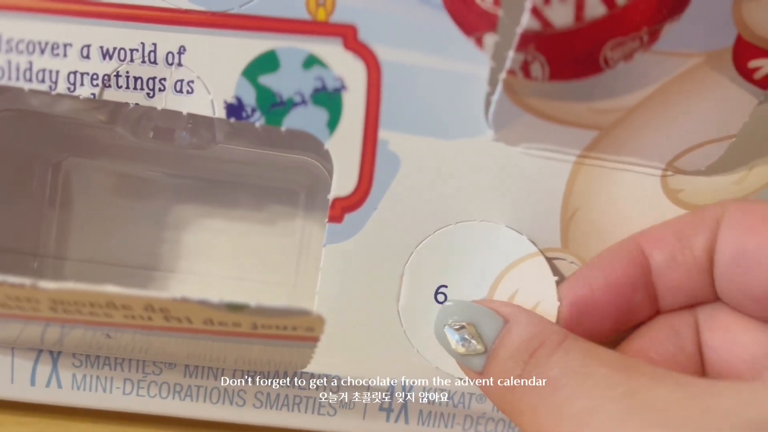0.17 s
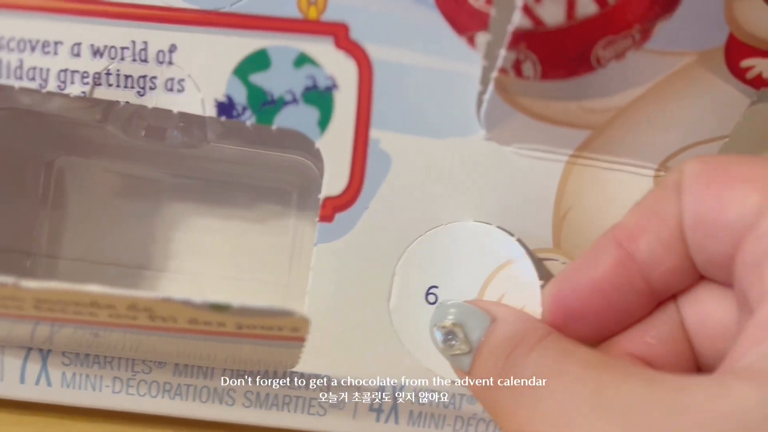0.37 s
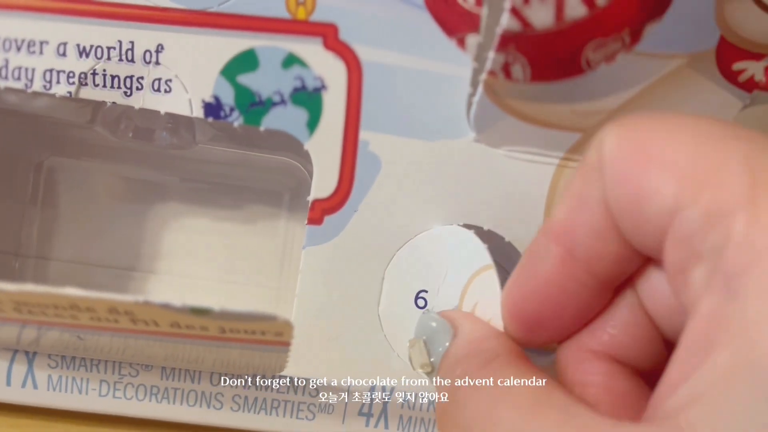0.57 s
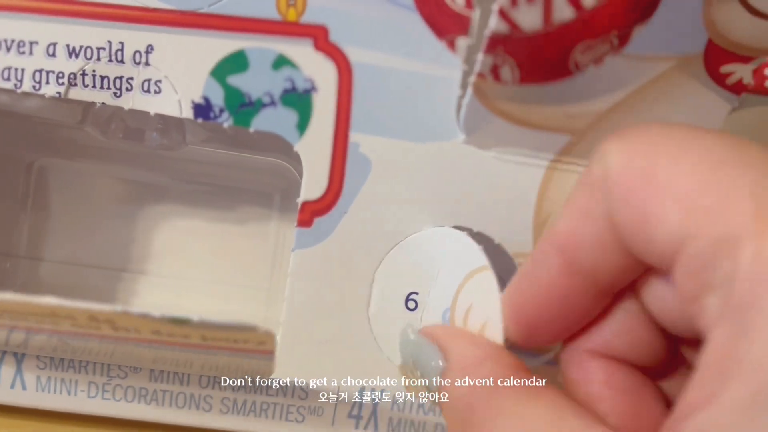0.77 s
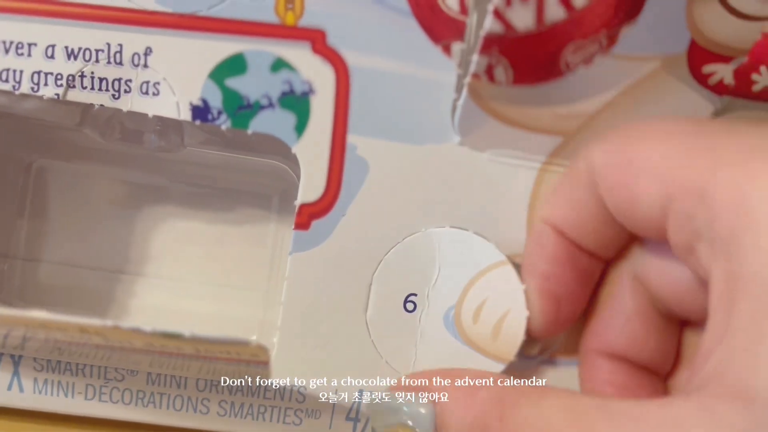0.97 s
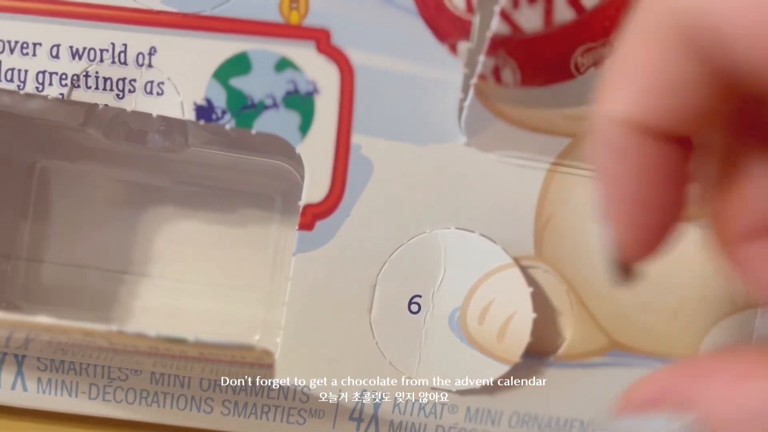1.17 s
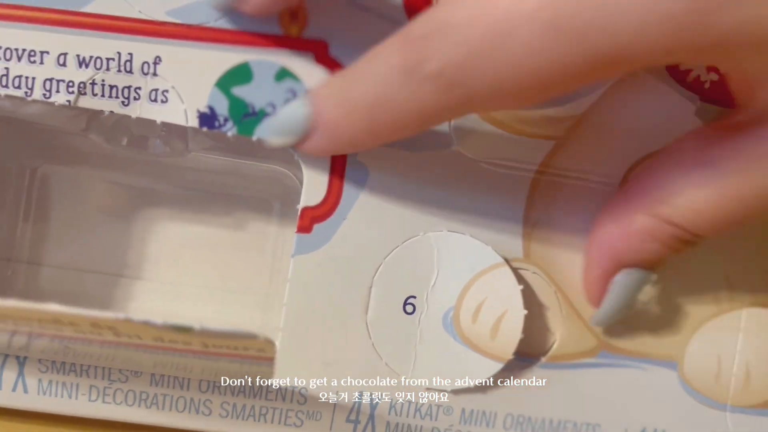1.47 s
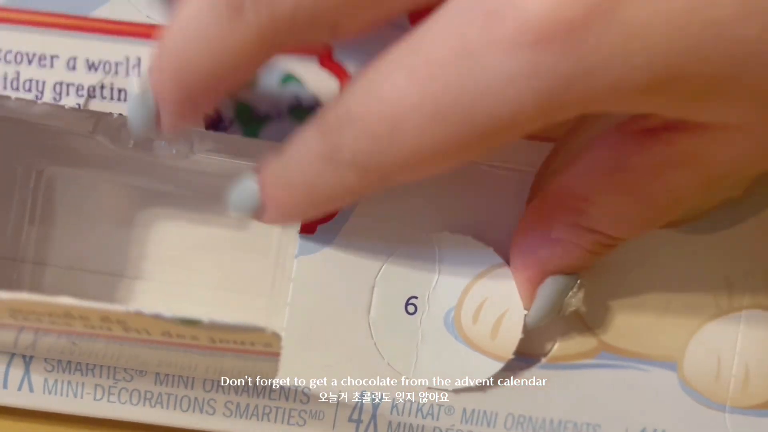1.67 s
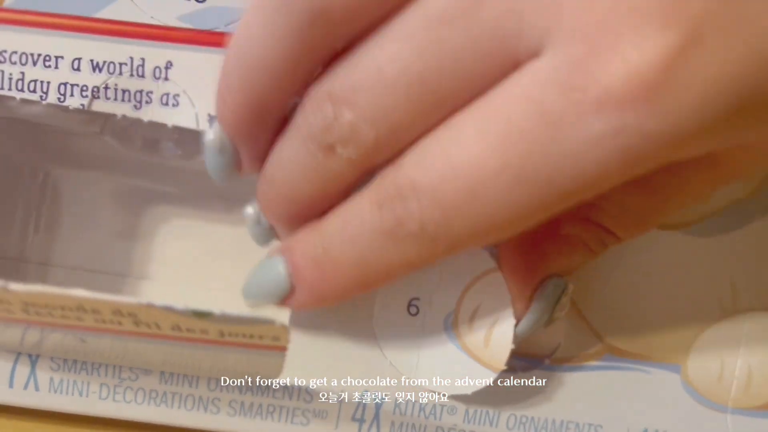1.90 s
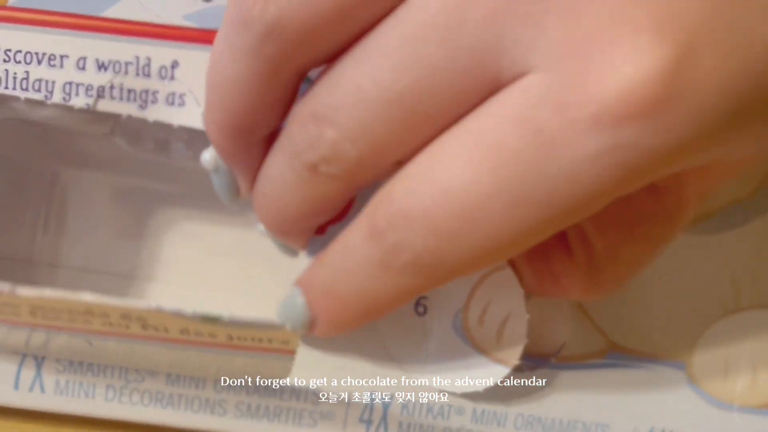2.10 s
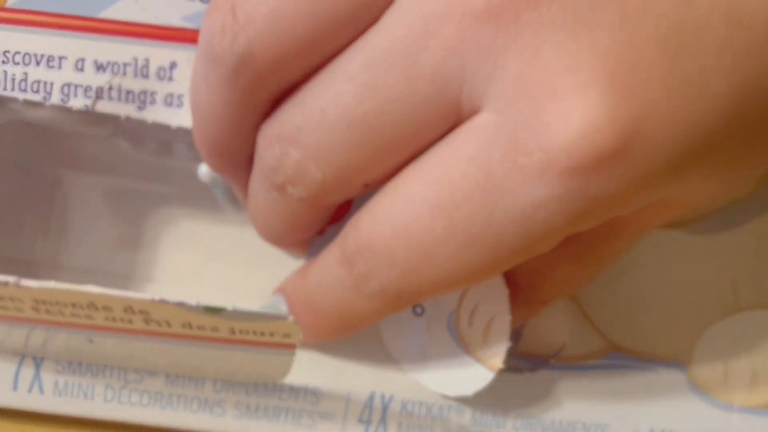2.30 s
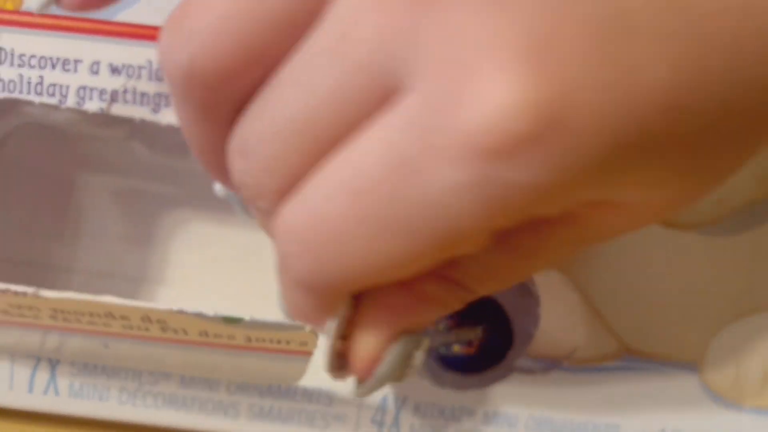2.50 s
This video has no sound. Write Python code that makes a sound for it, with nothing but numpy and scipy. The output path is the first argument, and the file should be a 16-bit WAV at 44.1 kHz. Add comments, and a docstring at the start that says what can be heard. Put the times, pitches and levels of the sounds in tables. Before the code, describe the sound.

Fingernails pry open a small perforated cardboard door with crisp snaps, scrapes and final foil crackles

```python
"""Ticks, sharp snaps and sliding fingers are heard from the start and throughout, close up in a small room.
Fingernails pry at the perforated door of a cardboard calendar; later presses end in a run of foil cracks.
Each snap is a set of dying sine waves for the stiff card, plus dying noise for the hollow box.
Sliding is grainy filtered noise, a brief groan is a wavering tone, and bumps are low sines.
Room echo, a low rumble and a quiet noise floor lie underneath."""
import sys
import numpy as np
from scipy import signal
from scipy.fft import rfft, irfft, next_fast_len
from scipy.io import wavfile
from scipy.ndimage import uniform_filter1d

SR = 44100
rng = np.random.default_rng(int(sys.argv[2]) if len(sys.argv) > 2 else 0)


def to_wav(s):
    """Save 16-bit WAV."""
    ch = np.atleast_2d(s).T  # columns
    pcm = np.round(np.clip(ch, -1, 1) * 32767)  # PCM
    wavfile.write(sys.argv[1], SR, pcm.astype(np.int16))


N = 116865
TIME = np.arange(N) / SR  # seconds

# Snaps of card, nail and foil: start_s, part that gives way, then level_db in each of six bands
SNAPS = [(.06, "card", -56.5, -44.5, -42, -35.5, -54, -62), (0.09, "card", -68, -55, -45, -37, -49.5, -68),
         (.113, "card", -60, -46, -41, -38, -48, -61), (0.1309, "card", -40.5, -47, -43, -49, -40.5, -46),
         (0.1844, "first tab", -36, -34, -30, -19.5, -22.5, -27),
         (0.3671, "last tab", -31, -29.5, -20.5, -18.5, -21.5, -28.5),
         (0.9757, "flap", -34.5, -30.5, -38, -31, -22, -34.5),
         (1.346, "card", -48.5, -23.5, -31, -29, -28, -43),
         (1.3532, "foil", -31.5, -39, -30, -33, -31, -39.5),
         (1.378, "last tab", -45.5, -47, -41, -43.5, -43, -52),
         (1.5436, "card", -48, -37.5, -40, -40, -43, -48),
         (1.5939, "card", -35, -41, -43.5, -34, -42, -48.5),
         (1.9333, "foil", -45, -35, -38.5, -49, -41, -52),
         (2.2586, "tray", -39, -34, -25.5, -23.5, -25, -32),
         (2.3315, "foil", -31.5, -25.5, -31.5, -24, -23.5, -31.5),
         (2.336, "foil", -46, -27.5, -33.5, -24.5, -37, -27),
         (2.3592, "foil edge", -51, -40.5, -34.5, -33.5, -31.5, -29),
         (2.386, "foil edge", -46.5, -34, -31.5, -32, -25, -41)]
# Borders of those six bands: edge_hz
BAND_EDGES_HZ = [40, 180, 700, 1500, 3000, 7500, 16000]
SNAP_GAIN_DB, SNAP_ATTACK_S = -0.5, 0.017  # the band levels are set over the attack
# Ringing notes of the card, before random detuning: pitch_hz, level_db, fade_by_60_db_s
CARD = [(803, -10.5, 0.031), (1010, -6.5, .017), (1752, -10, 0.045), (2166, 1, 0.019), (2448, -2, 0.021),
        (3080, -4, 0.012), (4210, -5.5, 0.0072), (5500, -3, 0.0035), (11130, -7, .0033)]
# The same columns for each part that gives way, listed by name
PART_MODES = {"card": CARD, "first tab": [(2222, 1, 0.011), (2960, -6.5, 0.0078), (5500, -1.5, 0.0037),
              (11600, -1.5, .0033)], "last tab": [(1059, -4.5, 0.031), (1870, -7.5, 0.021),
              (2174, 4.5, 0.0097), (2776, -7, .01), (4490, -4.5, 0.0048), (10900, 5, 0.0029)],
              "flap": [(714, -14, 0.047), (2670, 2, 0.006), (4220, -1.5, 0.0068), (5530, -12.5, 0.0091),
              (7000, -4, 0.0082), (10200, -10, 0.0028)], "tray": [(915, -14, 0.029), (1670, -12.5, 0.072),
              (2250, 11.5, 0.0054), (3050, 1, 0.0066), (4150, -6, 0.0051), (10600, -2, 0.0052)],
              "foil": [(860, -6, 0.035), (1580, -27, 0.0071), (2250, -1, 0.015), (4140, -3.5, 0.0037),
              (10860, 2, 0.003)], "foil edge": [(940, -1.5, 0.011), (3320, -1.5, 0.0094),
              (4030, -6, 0.0059), (11400, -17, 0.002)]}
DETUNE = 0.0062  # typical random shift, as a fraction of the pitch
GIVE_WAY_S = 0.00049  # the card takes this long to give way
# Dense ringing of the box and tray: band_hz, level_db_per_hz, fade_by_60_db_s
BOX_RINGING = [(70, -2, 0.16), (155.7, -3.5, 0.18), (350, -5.5, 0.18), (880, 0.5, 0.1), (2170, 1, 0.029),
               (4400, -6, 0.0084), (7900, -0.5, 0.012), (13000, 1.5, 0.0044)]
# The bass takes longer to build up; the extra time is half as long at BOX_SWELL_HZ
BOX_DB, BOX_SWELL_S, BOX_SWELL_HZ = -12, 0.0038, 400

# Ticks of a nail's edge, a crack and a short ring without the box's noise:
# start_s, peak_db, crack_db against the card's ring
TICKS = [(.02, -32, -26), (.128, -25.5, -8), (.142, -30, 21), (.173, -28, 12), (.312, -34, 34),
         (.679, -51.5, -28), (.748, -43, -8), (.802, -52, -28), (.844, -42.5, -13), (0.871, -51, -7),
         (.948, -39, -12), (1.256, -52, -19), (1.3075, -34.5, -9), (1.482, -32.5, -7), (1.901, -32.5, -8),
         (2.003, -27, 3), (2.028, -33, -5), (2.072, -34, -9), (2.094, -33.5, -24), (2.3015, -20, 17),
         (2.583, -34, -14), (2.622, -41, -18)]
TICK_CRACK_FADE_S = 0.0079  # time to fall by 60 dB

# Fibres and foil crackle ever louder until they give: start_s, length_s, final_level_db
TEARS = [(.950, 0.029, -27.5), (1.914, 0.036, -34), (2.313, 0.035, -37), (2.348, .018, -17.5),
         (2.363, 0.03, -24)]
# Tone colour of the tearing: band_hz, level_db_per_hz
TEAR_COLOUR = [(900, -1), (2200, -6), (3600, 2.5), (5500, -9), (8000, -5), (11000, -8.5), (16000, -30.5)]
TEAR_RISE_DB = 26

# Sliding fingers, before the gains below: time_s, murmur_level_db, scrape_level_db, hiss_level_db
SLIDES = [(0, -40.5, -50, -89), (.1, -48, -67, -105), (.16, -43.5, -48.5, -62), (.32, -55.5, -46, -64),
          (.645, -65.5, -61, -98), (.675, -42, -54.5, -66), (.72, -49.5, -61.5, -63), (.76, -56, -45, -70),
          (.79, -61, -66, -80), (.86, -49, -54.5, -62), (.9, -54, -64.5, -82), (.968, -54, -47.5, -67.5),
          (1.12, -84, -79.5, -85), (1.28, -68.5, -86, -94), (1.315, -43, -60, -61),
          (1.43, -35.5, -50.5, -61), (1.5, -55, -50.5, -54), (1.62, -39.5, -50, -50.5),
          (1.695, -47, -54.5, -67), (1.76, -39.5, -45, -48.5), (1.805, -39.5, -54, -85),
          (1.87, -32.5, -49, -70), (1.935, -40, -40.5, -60), (1.985, -39.5, -56, -68),
          (2.07, -32.5, -51, -45.5), (2.12, -37, -51, -52), (2.16, -39.5, -44, -44),
          (2.235, -42.5, -47.5, -65), (2.31, -77, -44, -43.5), (2.45, -55, -78, -52),
          (2.52, -31.5, -40.5, -47.5), (2.555, -44, -52, -77), (2.598, -24, -56, -86),
          (2.638, -41, -58, -95)]
# Tone colour of the box's hollow murmur: band_hz, level_db_per_hz
MURMUR_COLOUR = [(110, -7), (190, 1.5), (290, 1.5), (420, 4), (600, -4), (850, -2.5), (1200, -31.5)]
# Tone colour of the scrape: band_hz, level_db_per_hz
SCRAPE_COLOUR = [(800, -6), (1400, 1), (2200, -7), (3200, -7.5), (4800, -17.5), (7000, -15.5), (8500, -51)]
# Tone colour of the fine hiss: band_hz, level_db_per_hz
HISS_COLOUR = [(7500, -5.5), (10800, -6), (13000, -5), (15000, -29.5)]
MURMUR_GAIN_DB, SCRAPE_GAIN_DB, HISS_GAIN_DB = -6.5, -3.5, 2
GRAINS_PER_S, GRAIN_SPREAD_DB = 1800, 3.6
GRAIN_SHARE = 0.55  # grains' share of the power; smooth noise has the rest
CATCH_SPREAD_DB, CATCH_S = 2.6, 0.007  # how unevenly the fingers drag, and the length of one catch
CRACKLES_PER_S, CRACKLE_DB = 90, -3.5

# A fingertip judders across the lid: time_s, slips_hz before wavering, level_db
JUDDER = [(1.83, 323, -50), (1.865, 266, -37.5), (1.925, 272, -29), (1.965, 370, -55)]
JUDDER_ROUGHNESS = 0.2  # typical wavering, as a fraction of the slip rate

# The hand bumps the box: start_s, peak_db
BUMPS = [(0.139, -39), (0.761, -43), (1.263, -36), (1.312, -26.5), (1.629, -30.5), (1.735, -28),
         (1.755, -26), (2.148, -31), (2.271, -28.5), (2.441, -35.5), (2.593, -31.5)]
# Lowest notes of the box: pitch_hz, level_db, fade_by_60_db_s
BUMP_MODES = [(65.5, -2, 0.25), (86, -0.5, 0.092), (130.2, -2.5, 0.14)]
BUMP_CONTACT_S = 0.0099
# Tone colour of the holding hand's rumble: band_hz, level_db_per_hz
RUMBLE_COLOUR = [(35, -20.5), (58, 20.5), (100, 4.5), (160, 3), (300, -33)]
# Loudness of that rumble: time_s, level_db
RUMBLE_LEVEL = [(0, -50), (1.15, -54.5), (1.45, -46), (2.65, -46)]

# Hollow notes of the box: pitch_hz, width_hz, level_db
HOLLOW_NOTES = [(264.7, 16, 0), (370, 66, -5.5), (762, 47, -4)]
# The room's tail: band_hz, level_db_per_hz, fade_by_60_db_s
ROOM_TAIL = [(99.5, -7.5, 0.38), (400, -4, 0.092), (870, 1, 0.3), (2200, -3.5, 0.38), (5130, -4, 0.35),
             (7450, -6.5, 0.26)]
ROOM_DB, ROOM_SWELL_S = -21, 0.013
# The calendar lies to the left: band_hz, left_minus_right_db
LEFTNESS = [(80, 0.5), (250, 4.5), (550, 8), (1100, 4.5), (2300, 3), (4500, 8), (9000, -0.5)]
RIGHT_LAG_S = 0.000016
# How alike left and right are in noise: band_hz, correlation (no unit)
LIKENESS = [(60, 0.8), (350, 0.86), (950, 0.065), (2300, 0.37), (6000, 0.27), (14000, 0.34)]

# Tone colour of the quiet background: band_hz, level_db_per_hz
FLOOR_COLOUR = [(30, -5.5), (60, 3.5), (250, -4.5), (1000, -36.5), (4000, -38.5), (8000, -55),
                (15000, -54.5)]
FLOOR_DB = -58

BASS_CUT_HZ, TOP_HZ = 38, 15200  # the microphone fades above TOP_HZ
DIP_HZ, DIP_WIDTH_HZ, DIP_DEPTH = 8410, 5620, 0.94  # the microphone is dull around here
CUTOFF_HZ = 16500


def from_db(db):
    """Turn decibels into a gain."""
    return 10 ** (np.asarray(db) / 20)


def rms_one(x):
    """Scale a sound to an rms (average strength) of 1."""
    return x / np.sqrt(np.mean(x ** 2) + 1e-20)


def in_time(rows):
    """Draw each column of a table as a curve, sample by sample."""
    s, *columns = np.transpose(rows)
    return [np.interp(TIME, s, column) for column in columns]


def at_hz(rows, hz, column=1):
    """Read a table between its rows, on a log-frequency axis."""
    rows = np.array(rows)
    return np.interp(np.log(hz + 1e-9), np.log(rows[:, 0]), rows[:, column])


def add(out, s, sound):
    """Mix in a sound that starts at the given second."""
    start = max(int(s * SR), 0)
    out[..., start:start + sound.shape[-1]] += sound[..., :N - start]


def stereo_noise():
    """Draw white noise in four rows, two pairs of middle and side."""
    return rng.standard_normal((2, 2, N))


def stereo_bands(source):
    """Split two middle-and-side pairs into half-octave stereo bands, as alike left and right as LIKENESS."""
    edges = 22 * 2 ** np.arange(0, 10, .5)
    for k, (low, high) in enumerate(zip(edges, edges[1:])):
        band_filter = signal.butter(2, [low, high], "band", fs=SR, output="sos")
        # Neighbouring bands take turns between the two pairs
        mid, side = signal.sosfilt(band_filter, source[k % 2] + 1e-18)
        hz = np.sqrt(low * high)
        alike = np.clip(at_hz(LIKENESS, hz), -1, 1)
        yield hz, np.sqrt(1 + alike) * mid + np.sqrt(1 - alike) * side * [[1], [-1]]


def coloured(colour, source):
    """Shape the loudness of each frequency band; stereo, rms 1."""
    return rms_one(sum(from_db(at_hz(colour, hz)) * band for hz, band in stereo_bands(source)))


def ring(modes, t):
    """Struck modes: sine waves of fixed pitch that die away, with alternating sign."""
    out = 0
    for k, (hz, db, fade_s) in enumerate(modes):
        out = out + (-1) ** k * from_db(db - 60 * t / fade_s) * np.sin(2 * np.pi * hz * t)
    return out


def dying_noise(table, t, swell):
    """Countless modes heard as noise that builds up and dies; swell gives build-up seconds from Hz."""
    out = 0
    for hz, band in stereo_bands(rng.standard_normal((2, 2, len(t)))):
        fading = from_db(at_hz(table, hz) - 60 * t / at_hz(table, hz, column=2))
        out = out + band * fading * (1 - np.exp(-t / swell(hz)))
    return out


def voiced(hit, levels_db):
    """Bring a hit's attack to the given band levels, with a filter that adds no sound ahead of the hit."""
    size, attack = 2 * hit.shape[1], int(SNAP_ATTACK_S * SR)
    hz = np.arange(size // 2 + 1) * SR / size
    power = np.mean(abs(rfft(hit[:, :attack], size)) ** 2, axis=0) * 2 / size / attack
    log_gains = []
    for low, high, db in zip(BAND_EDGES_HZ, BAND_EDGES_HZ[1:], levels_db):
        strength = np.sqrt(power[(hz >= low) & (hz < high)].sum())
        log_gains.append((np.sqrt(low * high), np.log(from_db(db) / strength)))
    # Folding the cepstrum (the transform of the log gains) gives a minimum-phase filter
    cepstrum = irfft(at_hz(log_gains, hz))[:size // 2]
    equaliser = np.exp(2 * rfft(cepstrum, size) - cepstrum[0])
    return irfft(rfft(hit, size) * equaliser)[:, :size // 2]


def snaps():
    """Each snap rings the modes of the part that gives way and shakes the box into dying noise."""
    out, t = np.zeros((2, N)), TIME[:2 ** 13]

    def box_swell(hz):
        return BOX_SWELL_S * BOX_SWELL_HZ / (hz + BOX_SWELL_HZ) + GIVE_WAY_S

    for s, part, *levels_db in SNAPS:
        modes = [(hz * (1 + DETUNE * rng.normal()), db, fade_s) for hz, db, fade_s in PART_MODES[part]]
        card = ring(modes, t) * (1 - np.exp(-t / GIVE_WAY_S))
        box = dying_noise(BOX_RINGING, t, box_swell)
        box = box / box[:, :SR // 200].std()  # level the first 5 ms
        add(out, s, voiced(card + from_db(BOX_DB) * box, levels_db))
    return from_db(SNAP_GAIN_DB) * out


def ticks():
    """A nail's edge catches: a crack of bright noise and a short ring of the card."""
    out, t = np.zeros((2, N)), TIME[:SR // 25]
    for s, db, crack_db in TICKS:
        # Differences between neighbouring samples make the noise bright
        bright = np.diff(rng.standard_normal((2, len(t) + 1))) / 2
        crack = bright * from_db(crack_db - 60 * t / TICK_CRACK_FADE_S)
        modes = [(hz * rng.uniform(.85, 1.15), level_db, fade_s) for hz, level_db, fade_s in CARD]
        tick = ring(modes, t) + crack
        add(out, s, from_db(db) * tick / abs(tick).max())
    return out


def friction():
    """Tiny catches on the paper fibres come in uneven strengths, over smooth sliding noise."""
    sizes = from_db(GRAIN_SPREAD_DB * np.minimum(rng.exponential(1, N), 4))
    drag = rms_one(uniform_filter1d(rng.standard_normal(N), size=int(CATCH_S * SR)))
    clumps = from_db(CATCH_SPREAD_DB * drag)
    caught = rng.random(N) < GRAINS_PER_S / SR
    grains = rms_one(caught * clumps * sizes * rng.choice([-1, 1], (2, 2, N)))
    return np.sqrt(GRAIN_SHARE) * grains + np.sqrt(1 - GRAIN_SHARE) * stereo_noise()


def tears():
    """Runs of tiny breaks, made of grainy noise, swell as the strain grows."""
    strain = np.zeros(N)
    for s, length_s, db in TEARS:
        add(strain, s, from_db(db + np.linspace(-TEAR_RISE_DB, 0, int(length_s * SR))))
    return strain * coloured(TEAR_COLOUR, friction())


def crackle():
    """Now and then a coarser fibre catches and rings the card, each mode with a strength of its own."""
    caught = rng.random(N) < CRACKLES_PER_S / SR
    out = np.zeros(N)
    for mode in CARD:
        strikes = caught * rng.standard_normal(N)
        out += signal.fftconvolve(strikes, ring([mode], TIME[:SR // 20]))[:N]
    return rms_one(out)


def sliding():
    """Skin and nails drag over the card: a hollow murmur, a crackling scrape and a fine hiss."""
    murmur_db, scrape_db, hiss_db = in_time(SLIDES)
    drag = friction()
    murmur = coloured(MURMUR_COLOUR, drag)
    scrape = coloured(SCRAPE_COLOUR, drag) + from_db(CRACKLE_DB) * crackle()
    hiss = coloured(HISS_COLOUR, drag)
    return (from_db(murmur_db + MURMUR_GAIN_DB) * murmur
            + from_db(scrape_db + SCRAPE_GAIN_DB) * scrape
            + from_db(hiss_db + HISS_GAIN_DB) * hiss)


def judder():
    """Uneven stick and slip of a fingertip makes the lid groan: a wavering tone and its octave."""
    slips_hz, db = in_time(JUDDER)
    unevenness = rms_one(uniform_filter1d(rng.standard_normal(N), size=150))
    phase = 2 * np.pi * np.cumsum(slips_hz * (1 + JUDDER_ROUGHNESS * unevenness)) / SR
    touching = (TIME > JUDDER[0][0]) & (TIME < JUDDER[-1][0])
    return touching * from_db(db) * (np.sin(phase) + 0.35 * np.sin(2 * phase))


def hollow(x):
    """The air and walls of the box ring on at a few notes, made by narrow resonant filters."""
    out = x
    for hz, width_hz, db in HOLLOW_NOTES:
        out = out + from_db(db) * signal.lfilter(*signal.iirpeak(hz, hz / width_hz, fs=SR), x + 1e-18)
    return out


def room(x):
    """A short indoor tail: the sound is smeared by noise that builds up and dies."""
    tail = dying_noise(ROOM_TAIL, TIME[:SR // 2], lambda hz: ROOM_SWELL_S)
    tail = tail / np.sqrt(np.sum(tail ** 2) / 2)
    mono = x.mean(axis=0)[None]
    return from_db(ROOM_DB) * signal.fftconvolve(mono, tail, axes=1)[:, :N]


def placed(x):
    """Shift the balance by frequency, mostly to the left, at constant power; the right comes slightly later."""
    size = next_fast_len(N + SR // 10)
    hz = np.arange(size // 2 + 1) * SR / size
    ratio = from_db(at_hz(LEFTNESS, hz))
    right_lag = np.exp(-2j * np.pi * hz * RIGHT_LAG_S)
    sides = np.array([ratio, right_lag]) * np.sqrt(2 / (1 + ratio ** 2))
    return irfft(rfft(x, size) * sides, size)[:, :N]


def handling():
    """Soft bumps ring the lowest modes of the box, over the rumble of the hand holding it."""
    bumps = np.zeros(N)
    contact = np.hanning(int(BUMP_CONTACT_S * SR))  # a soft push
    thud = np.convolve(ring(BUMP_MODES, TIME[:SR // 2]), contact)
    for s, db in BUMPS:
        add(bumps, s - BUMP_CONTACT_S, from_db(db) * thud / abs(thud).max())
    rumble_db, = in_time(RUMBLE_LEVEL)
    return bumps + from_db(rumble_db) * coloured(RUMBLE_COLOUR, stereo_noise())


def background():
    """A quiet, steady noise floor."""
    return from_db(FLOOR_DB) * coloured(FLOOR_COLOUR, stereo_noise())


def scene():
    """The calendar in its room, the hand holding it and the quiet background."""
    calendar = hollow(snaps() + ticks() + tears() + sliding()) + judder()
    return placed(calendar + room(calendar)) + handling() + background()


def record(dry):
    """The microphone: thin deep bass, a dip and a fade in the treble, a ceiling, a steep top cut."""
    band_filter = signal.butter(2, [BASS_CUT_HZ, TOP_HZ], "band", fs=SR, output="sos")
    x = signal.sosfilt(band_filter, dry)
    dip = signal.lfilter(*signal.iirpeak(DIP_HZ, DIP_HZ / DIP_WIDTH_HZ, fs=SR), x)
    heard = np.clip(x - DIP_DEPTH * dip, -1, 1)
    return signal.sosfilt(signal.cheby2(12, 60, CUTOFF_HZ, fs=SR, output="sos"), heard)


dry = scene()
out = record(dry)
to_wav(out)
```